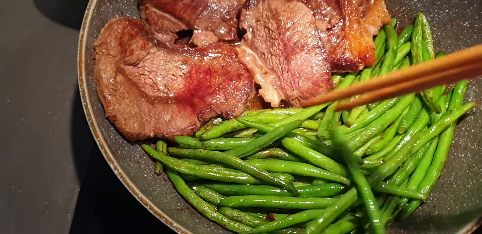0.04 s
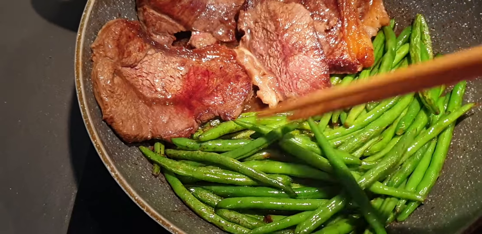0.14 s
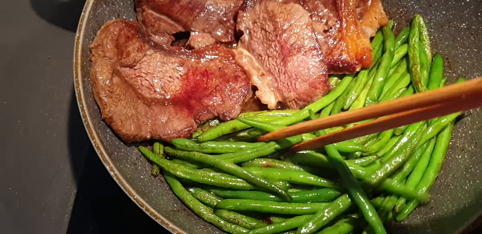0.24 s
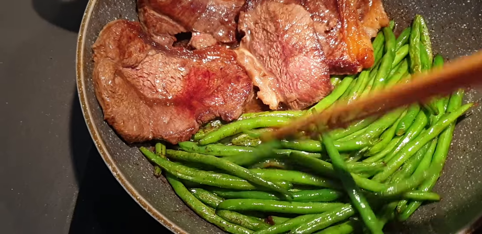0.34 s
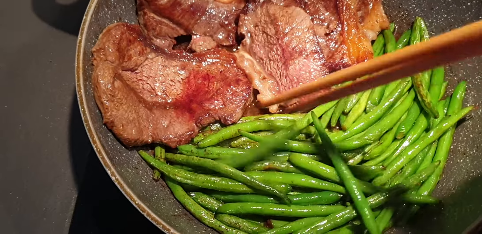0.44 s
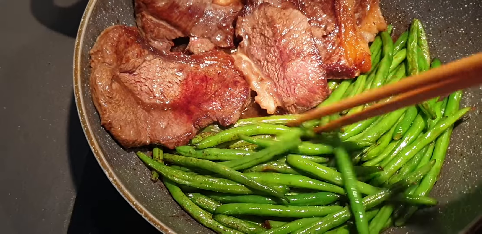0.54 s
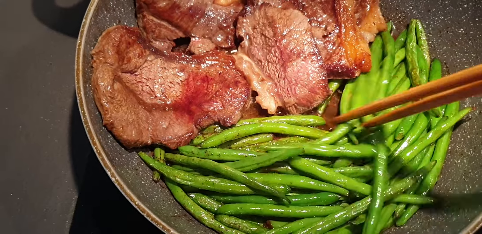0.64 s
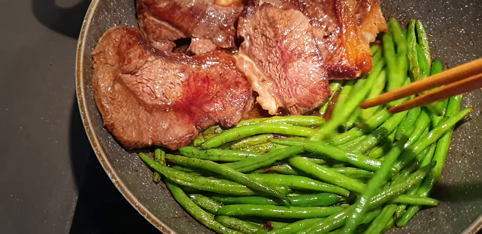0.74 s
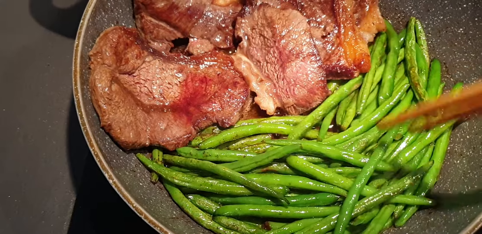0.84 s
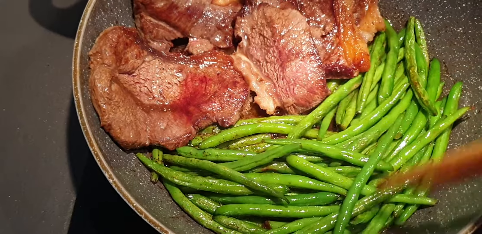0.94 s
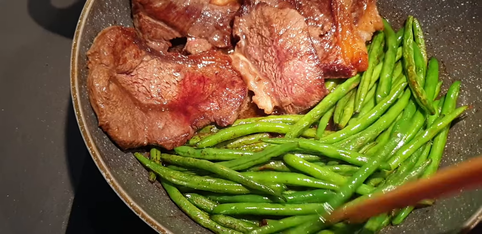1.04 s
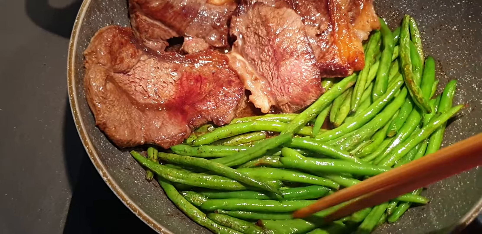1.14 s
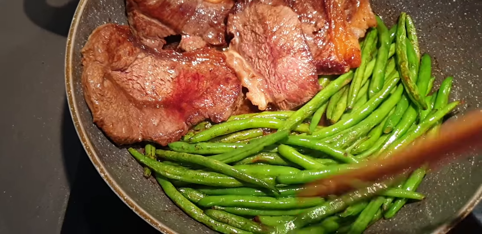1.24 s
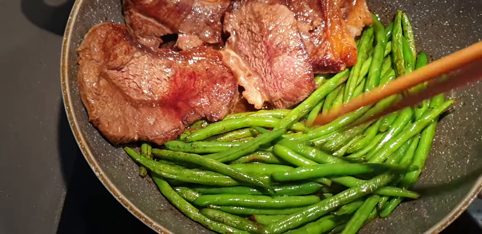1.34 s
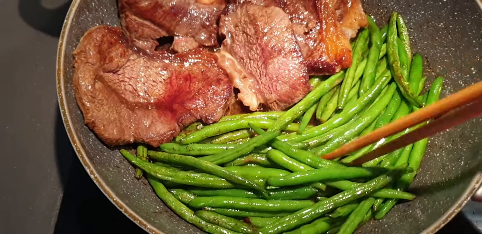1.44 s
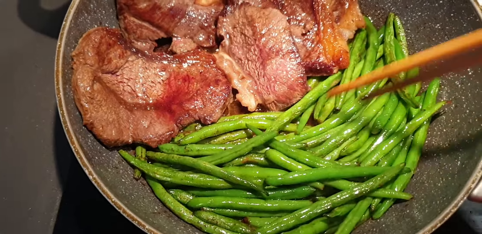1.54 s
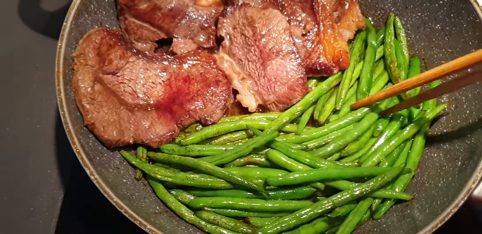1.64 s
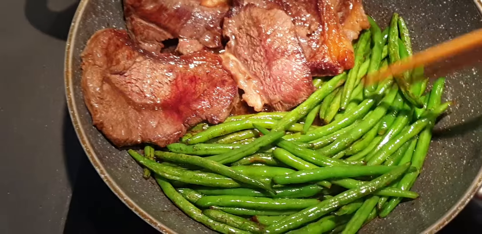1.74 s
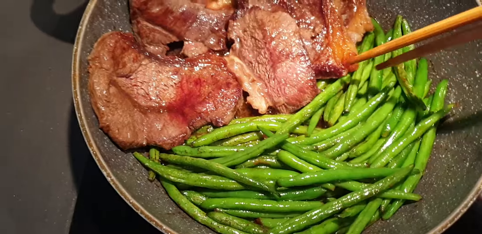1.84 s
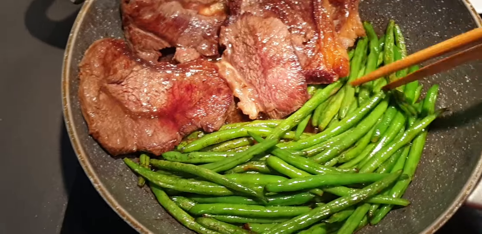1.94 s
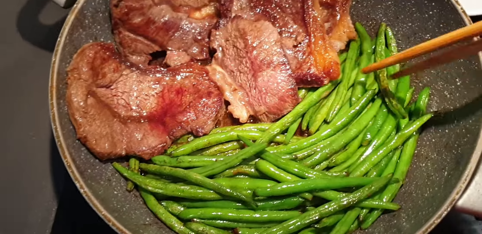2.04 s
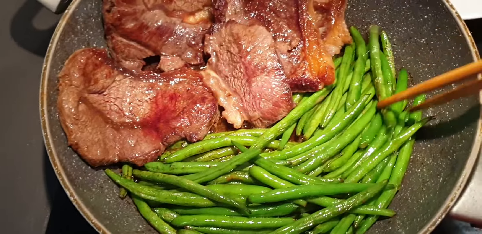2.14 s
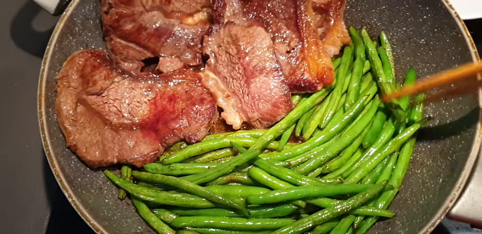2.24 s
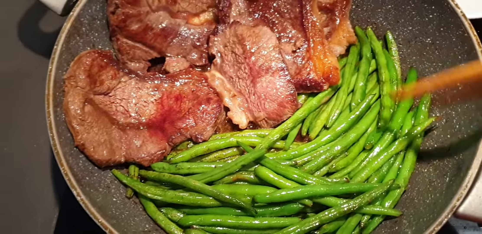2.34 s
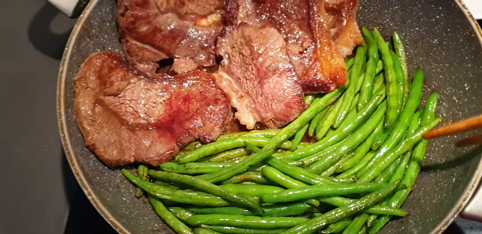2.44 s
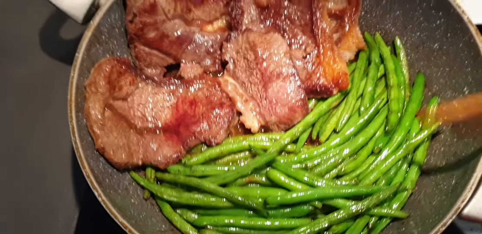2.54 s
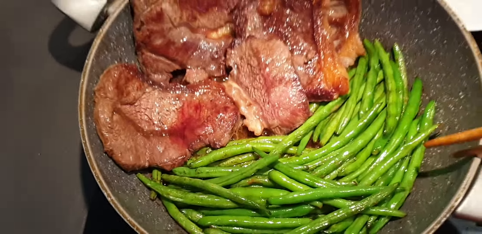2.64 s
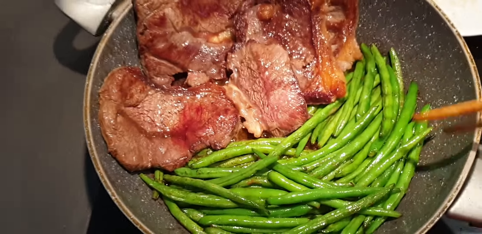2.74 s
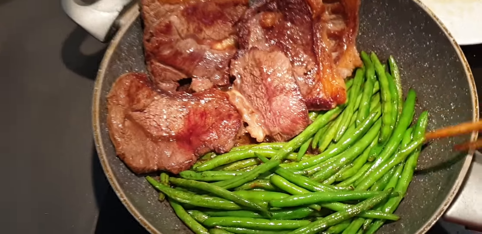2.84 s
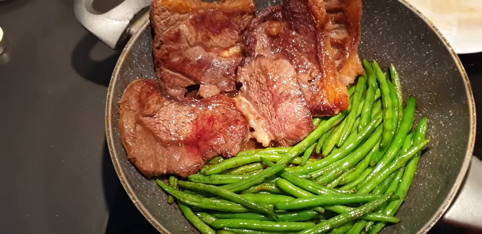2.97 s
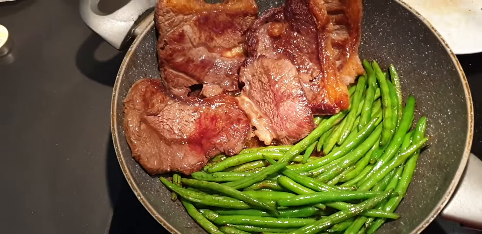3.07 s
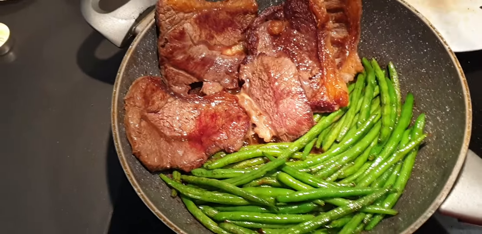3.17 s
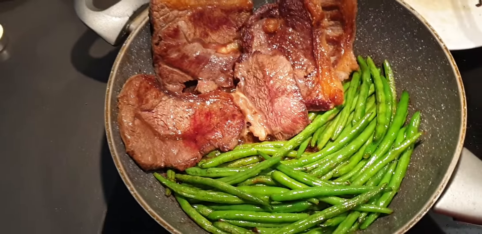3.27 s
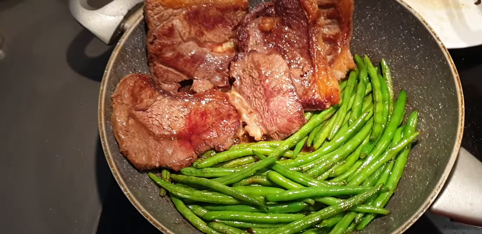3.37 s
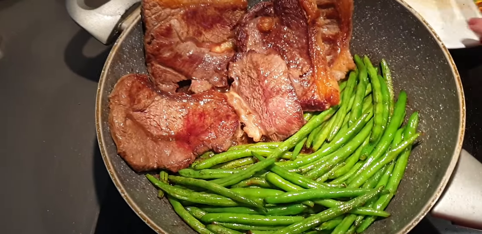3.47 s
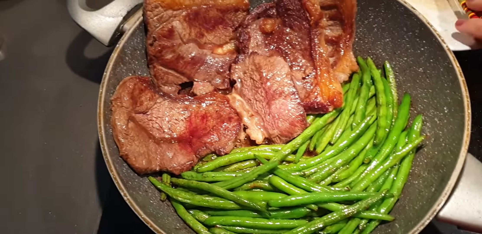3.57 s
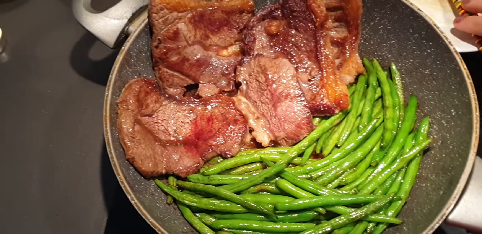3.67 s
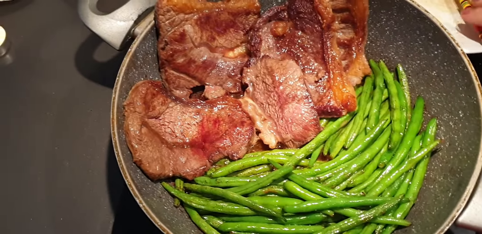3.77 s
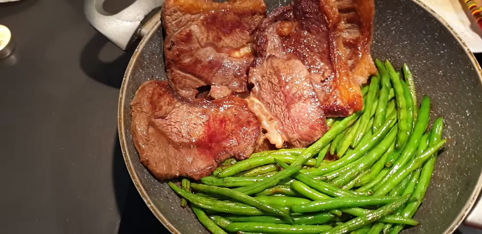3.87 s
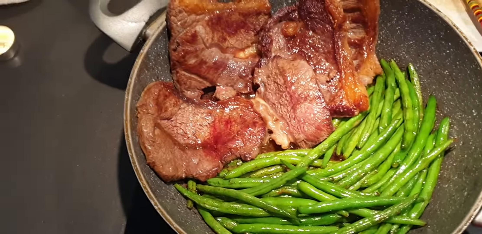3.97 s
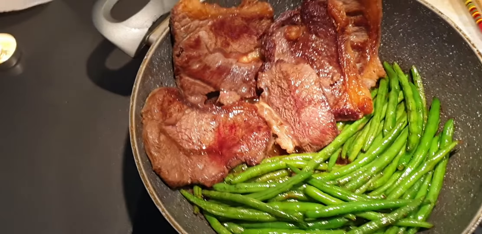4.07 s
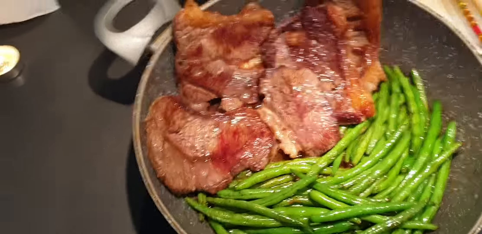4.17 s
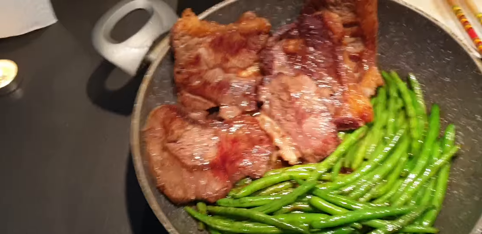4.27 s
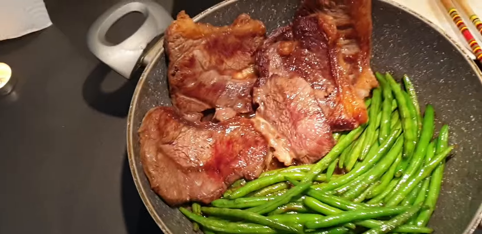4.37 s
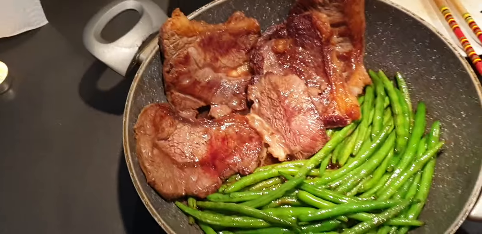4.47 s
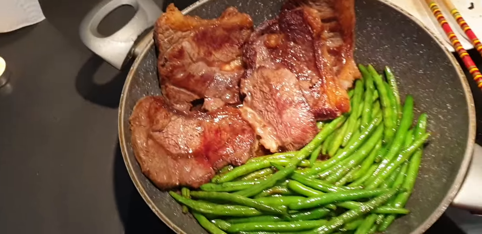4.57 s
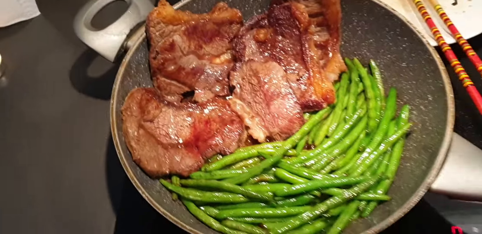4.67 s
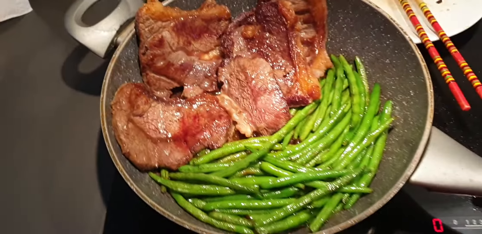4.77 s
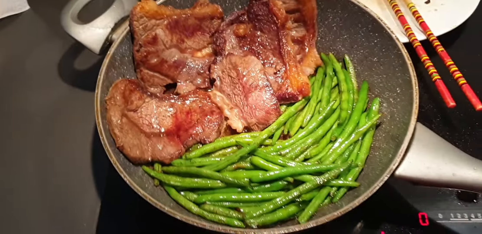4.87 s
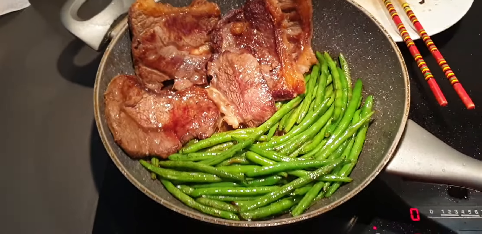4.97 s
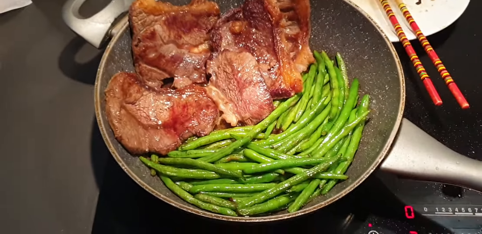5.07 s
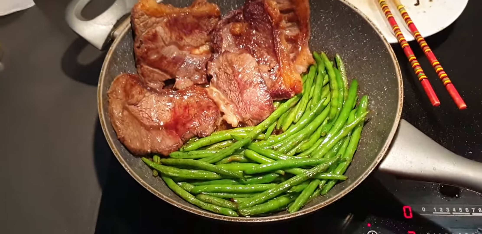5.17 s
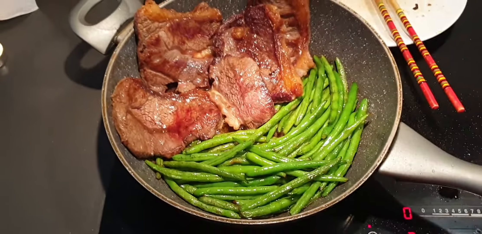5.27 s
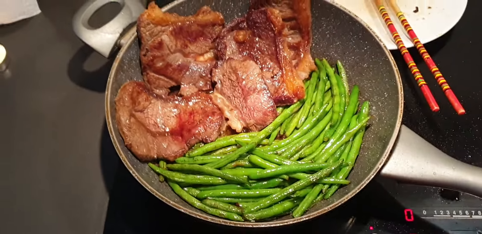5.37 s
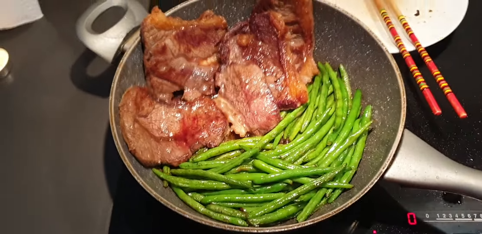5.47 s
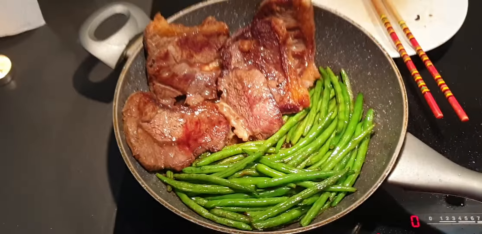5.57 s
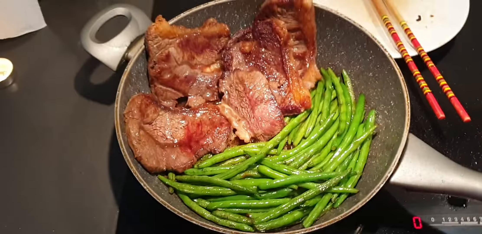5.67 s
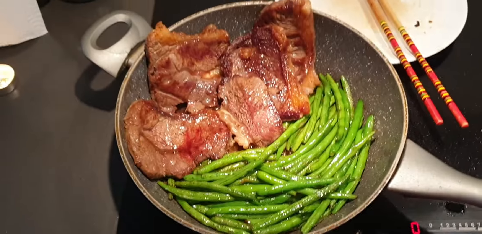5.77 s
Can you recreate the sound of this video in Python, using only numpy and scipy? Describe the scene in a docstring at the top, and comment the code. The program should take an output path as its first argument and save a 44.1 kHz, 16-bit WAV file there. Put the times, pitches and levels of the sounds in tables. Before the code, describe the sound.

Close stereo pickup in a small, hard kitchen, weighted left: faint frying hiss with fat ticks and airy steam puffs above a steady low rumble and fan tone. After a dull thump, three short dry wooden raps hit the pan edge. Shortly after, chopsticks clatter on a ceramic plate with a thud beneath, by far the loudest event. The fan then slows, thin squeaks chirp, and fabric rustles softly near the end.

```python
"""Quiet frying with wooden chopsticks

Steak and beans fry in a pan: the sizzle is filtered grainy noise, fading as the pan dries. The hob's
rumble and fan are filtered noise plus a blade tone, weaker as the fan slows. Chopsticks rap the rim three
times and drop rattling on a plate, with thumps below: each contact rings damped modes and cracks. Fat spits,
stirring ticks, steam puffs and a late cloth rustle are noise bursts; steam squeaks glide. Two ports hear it."""
import sys
import numpy as np
from scipy import signal
from scipy.fft import rfft, irfft, next_fast_len
from scipy.io import wavfile
from scipy.ndimage import uniform_filter1d

SR = 44100
rng = np.random.default_rng(int(sys.argv[2]) if len(sys.argv) > 2 else 0)


def bounce(signal):
    """Save signal as a 16-bit WAV file at the path given by the first command-line argument."""
    frames = np.transpose(np.atleast_2d(signal))
    limited = np.clip(frames, -1, 1)
    pcm = np.round(limited * 32767).astype(np.int16)
    wavfile.write(sys.argv[1], SR, pcm)


N = 256220
SIDES = np.array([[1], [-1]])  # left, right
HOP = 256  # samples between short-time spectra


def undb(db):
    """Level definition: the amplitude gain of a level in dB."""
    return 10 ** (np.asarray(db) / 20)


def read(table, hz):
    """Logarithmic pitch scale: a (f/Hz, value) table interpolated over log frequency."""
    f, v = np.transpose(table)
    return np.interp(np.log(np.maximum(hz, 1)), np.log(f), v)


def curves(table, t):
    """Linear interpolation: each column of a table whose first column is t/s."""
    times, *columns = np.transpose(table)
    return [np.interp(t, times, column) for column in columns]


def decay(t, t60):
    """Reverberation time: an exponential that falls 60 dB in t60 seconds."""
    return np.exp(-np.log(1000) * t / t60)


def walk(rate, count=1, step=1):
    """Smoothed random modulation: rows of levels held 1 / rate s and slewed twice, one value per step."""
    k, size = max(int(SR / rate / step), 1), N // step + 2
    held = np.repeat(rng.standard_normal((count, size // k + 1)), k, axis=1)
    return uniform_filter1d(uniform_filter1d(held, k), k)[:, :size]


def add(out, s, sound):
    """Superposition: mix a sound in at s seconds."""
    i = int(s * SR)
    out[:, i:i + sound.shape[-1]] += sound[..., :N - i]


# Likeness of the two channels, 0 to 1: f/Hz, likeness
LIKENESS = [(60, 1), (130, 1), (290, 0.68), (640, 0.87), (1410, 0.67), (3100, 0), (6820, 0.22), (15000, 0)]


def alike(hz):
    """Interaural-style coherence: how alike the two ports hear a frequency."""
    return np.clip(read(LIKENESS, hz), 0, 1)


def spread(mid, side, likeness):
    """Mid-side coherence: two independent noises make a stereo pair of the given likeness."""
    return mid * np.sqrt(1 + likeness) + SIDES * side * np.sqrt(1 - likeness)


def noise(t, hz, width_hz, top_hz=20000):
    """Band-limited noise: stereo, of rms 1, as alike left and right as at the band's centre."""
    edges = [max(hz - width_hz / 2, hz / 5), min(hz + width_hz / 2, top_hz)]
    band = signal.butter(2, edges, "band", fs=SR, output="sos")
    mid, side = signal.sosfilt(band, rng.standard_normal((2, len(t))))
    return spread(mid, side, alike(hz)) / mid.std() / np.sqrt(2)


def bed(colour, swell_db, flicker_db, rate, grain=1, tilt_db=0):
    """Spectral shaping: noise set to rms 1, then third-octave bands swell together and flicker alone."""
    size = next_fast_len(N)
    hz = np.arange(size // 2 + 1) * SR / size
    mid, side = rfft(rng.standard_normal((2, N)) * grain, size)
    pair = irfft(spread(mid, side, alike(hz)) * undb(read(colour, hz)), size)[:, :N]
    f, _, cells = signal.stft(pair / pair.std(), SR, nperseg=2 * HOP)
    # each frequency takes its flicker from the two nearest band positions
    band = 3 * np.log2(np.maximum(f, 86) / 86)
    low = band.astype(int)
    flicker = walk(rate, count=26, step=HOP)
    db = flicker_db * (flicker[low] + (band - low)[:, None] * (flicker[low + 1] - flicker[low]))
    db = db + swell_db * walk(rate / 4, step=HOP)
    treble_octaves = np.log2(np.maximum(f, 6000) / 6000)[:, None]
    db = db[:, :cells.shape[-1] - 1] + tilt_db * treble_octaves
    gain = undb(np.pad(db, ((0, 0), (0, 1)), "edge"))
    return signal.istft(cells * gain, SR, nperseg=2 * HOP)[1][:, :N]


# Decay time of the room: f/Hz, t60/s
ROOM_DECAY = [(200, 0.94), (1000, 0.52), (4000, 0.49), (12000, 0.28)]


def kitchen(dry, level_db=-10.5):
    """Diffuse reverberation: a small hard room's dense noise tail, shorter in the treble."""
    f, t, cells = signal.stft(rng.standard_normal((2, SR // 2)), SR, nperseg=128)
    tail = signal.istft(cells * decay(t, read(ROOM_DECAY, f)[:, None]), SR, nperseg=128)[1]
    # silent for 4 ms, then rising over 11 ms
    tail = tail * np.clip((np.arange(tail.shape[1]) / SR - .004) / 0.011, 0, 1)
    tail = tail / np.sqrt((tail ** 2).sum(1).mean())
    return undb(level_db) * signal.oaconvolve(dry, tail, axes=1)[:, :N]


# Relative spectrum of the rumble: f/Hz, level/dB per Hz
RUMBLE_COLOUR = [(15, -48), (25, -19), (54, 2), (68, 2.5), (87, -11), (103, -2), (119, 2), (146, -8),
                 (195, -12.5), (258, -17), (345, -13), (385, -21), (450, -20), (580, -51), (990, -120)]
# Course of the hob's noise as its fan slows: t/s, fan level/dB, rumble level/dB
HOB_LEVELS = [(0, -63, -55.5), (2.5, -63, -56.5), (3.9, -64.5, -58), (4.55, -67, -60), (4.9, -71, -63),
              (5.4, -69.5, -63), (5.65, -69, -59.5)]


def hob_rumble(t):
    """Low-frequency broadband noise: the rumble follows the hob's level curve."""
    _, rumble_db = curves(HOB_LEVELS, t)
    return undb(rumble_db) * bed(RUMBLE_COLOUR, 1.0, 1.4, 4)


# Relative spectrum of the fan's noise: f/Hz, level/dB per Hz
FAN_COLOUR = [(290, -38.5), (500, -7.5), (591, -16), (756, -8.5), (836, -13), (909, -3.5), (988, -10),
              (1060, -4), (1210, -1.5), (1310, -2.5), (1900, -10), (2470, -39), (4180, -120)]
BLADE_HZ, BLADE_DB = 1245, -7.5  # mean pitch; initial mean level against the fan noise
BLADE_FADE_START_S, BLADE_FADE_DB_S = 4.3, 10


def hob_fan(t):
    """Blade-passing tone in flow noise: the wavering tone sinks into the noise as the fan slows."""
    fan_db, _ = curves(HOB_LEVELS, t)
    fade_db = BLADE_FADE_DB_S * np.maximum(t - BLADE_FADE_START_S, 0)
    blade_db = BLADE_DB - fade_db + 5.5 * walk(10)[0, :N]
    blade_hz = BLADE_HZ * (1 + 0.0012 * walk(7.4)[0, :N])
    blade = undb(blade_db) * np.sin(2 * np.pi * np.cumsum(blade_hz) / SR)
    return undb(fan_db) * (bed(FAN_COLOUR, 0.9, 0.94, 8) + blade)


# Steam squeaks: start t/s, length t/s, first f/Hz, middle f/Hz, last f/Hz, level/dB,
# octave level/dB against the fundamental
STEAM_SQUEAKS = [(1.267, 0.024, 5600, 5200, 4830, -64, -20), (1.365, .075, 2500, 3100, 2630, -65, -15),
                 (1.992, 0.048, 3200, 3410, 3150, -64, -4), (3.09, 0.044, 3300, 3170, 2900, -69, -16),
                 (3.232, 0.055, 5350, 5180, 5400, -60.5, -20), (4.753, 0.027, 3600, 3520, 3500, -64.5, -4),
                 (4.845, 0.021, 3950, 3800, 3550, -68.5, -2), (4.955, 0.095, 3200, 3420, 3200, -65, 2),
                 (5.09, .06, 3600, 3480, 3090, -66, 2), (5.385, .03, 3850, 3500, 3200, -67, -10),
                 (5.748, 0.026, 3800, 3600, 3380, -69.5, 1)]


def squeaks(waver=0.028, flutter_db=4.5):
    """Whistle in a gap: forced steam sounds a gliding harmonic tone; pitch and level tremble."""
    out, tremble, flutter = np.zeros((2, N)), walk(200)[0], walk(110)[0]
    for s, length, first_hz, middle_hz, last_hz, db, octave_db in STEAM_SQUEAKS:
        u = np.linspace(0, 1, int(length * SR))
        i = int(s * SR) + np.arange(len(u))
        # a parabola through the three pitches
        arc = np.polyval(np.polyfit([0, .5, 1], [first_hz, middle_hz, last_hz], 2), u)
        phase = 2 * np.pi * np.cumsum(arc * (1 + waver * tremble[i])) / SR + 0.38 * SIDES
        overtones = np.sin(2 * phase) + 0.4 * np.sin(3 * phase)
        tone = np.sin(phase) + undb(octave_db) * overtones
        add(out, s, tone * np.sin(np.pi * u) ** .4 * undb(db + flutter_db * flutter[i]))
    return out


# Steam puffs, and from 5.25 s the soft broad swishes of a cloth rustle (the last three rows):
# middle t/s, length at half amplitude t/s, centre f/Hz, bandwidth f/Hz, level/dB at the middle
PUFFS_AND_RUSTLE = [(0.094, 0.053, 9500, 2500, -62), (0.309, 0.053, 8800, 2000, -60.5),
                    (.37, .06, 12500, 4050, -65), (.54, 0.047, 8050, 2000, -62),
                    (0.602, 0.055, 13400, 3000, -64), (0.696, 0.023, 11200, 1970, -57),
                    (1.16, .08, 12900, 4500, -63), (1.47, 0.085, 12100, 5000, -68),
                    (2.274, 0.045, 12500, 3000, -65), (3.26, 0.08, 4900, 1500, -65.5),
                    (4.625, 0.095, 12000, 6000, -70), (5.287, 0.086, 4000, 7000, -59.5),
                    (5.405, 0.1, 4070, 8000, -59.5), (5.48, 0.051, 2490, 4000, -64)]


def puffs_and_rustle():
    """Enveloped band noise: steam puffs, then cloth swishes, each swell and die away."""
    out = np.zeros((2, N))
    for s, length, hz, width_hz, db in PUFFS_AND_RUSTLE:
        t = np.arange(int(2 * length * SR))
        add(out, max(s - length, 0), undb(db) * noise(t, hz, width_hz) * np.hanning(len(t)))
    return out


# Fat spits, and small low stirring ticks of the chopsticks in the pan (at 0.279 and 0.397 s):
# t/s, level/dB at the start, centre f/Hz
SPITS_AND_STIRRING = [(0.2687, -58, 9290), (.279, -53, 2200), (.397, -53, 1900), (0.522, -55, 8300),
                      (0.694, -53, 10500), (0.886, -54, 6160), (1.6483, -41.5, 13500), (1.649, -54, 3500),
                      (1.83, -54.5, 5800), (2.579, -54.5, 7960), (2.596, -54, 9050), (3.716, -51, 12000),
                      (4.3439, -57, 9640), (4.5929, -52, 11000), (4.646, -53, 3500), (4.648, -44.5, 12900),
                      (4.921, -57.5, 5100)]
CLICK_DECAY_S, CLICK_WIDTH = .003, .85  # time constant; bandwidth as a share of the centre


def spits_and_stirring():
    """Impulsive noise: water drops bursting in the fat and two stirring ticks are decaying band noise."""
    out, t = np.zeros((2, N)), np.arange(SR // 20) / SR
    for s, db, hz in SPITS_AND_STIRRING:
        add(out, s, undb(db) * noise(t, hz, CLICK_WIDTH * hz) * np.exp(-t / CLICK_DECAY_S))
    return out


TICKS_PER_S, TICK_HZ, TICK_DECAY_S = 30, 11500, .0015
TICK_DB, TICK_FADE_DB_S = -62, .7  # mean level at the outset; its fall


def fat_ticks(t):
    """Poisson impulses: the fat ticks faintly at random times, softer as the pan dries."""
    tick_db = TICK_DB + 3 * rng.standard_normal(N) - TICK_FADE_DB_S * t
    starts = (rng.random(N) < TICKS_PER_S / SR) * undb(tick_db)
    envelope = signal.lfilter([1], [1, -np.exp(-1 / (TICK_DECAY_S * SR))], starts)
    return noise(t, TICK_HZ, CLICK_WIDTH * TICK_HZ) * envelope


# Relative spectrum of the sizzle: f/Hz, level/dB per Hz
SIZZLE_COLOUR = [(1180, -31), (2000, -4), (2220, -3.5), (3390, -1), (3660, -2), (4470, -1.5), (7320, -6),
                 (8400, -4.5), (10800, -4.5), (14500, -10.5), (15800, -20)]
# Course of the frying as the pan dries: t/s, level/dB, treble tilt/dB per octave above 6 kHz
FRYING_LEVELS = [(0, -60, 1), (.7, -60, 1.5), (1, -60.5, -2.5), (1.35, -60, -2.5), (1.9, -61, 1),
                 (2.45, -62, .5), (3, -60.5, 0), (3.4, -63, 1), (4.2, -62.5, -.5), (5.2, -62.5, .5),
                 (5.81, -63.5, .5)]


def sizzle(t):
    """Bubble noise: countless tiny bursts, a few larger, with brief showers brightening the treble."""
    sizzle_db, tilt_db = curves(FRYING_LEVELS, t)
    bubbles = undb(2.4 * rng.exponential(size=N))
    showers_db = tilt_db[::HOP] + 2.3 * walk(45, step=HOP)[0, :-1]
    return undb(sizzle_db) * bed(SIZZLE_COLOUR, 1.1, 1.9, 18.11, bubbles, showers_db)


PORT_LAG = 2.2  # radians between the ports for a mode heard wholly unlike


def blows(events, modes, body):
    """Modal excitation: a contact rings the modes near its spectral centre, with a crack and a noise haze."""
    crack_db, crack_s, crack_top_hz, free_db, haze_db, haze_s, pan_db = body
    out, t = np.zeros((2, N)), np.arange(SR // 2) / SR
    hz, db, t60 = np.array(modes).T
    tones = np.exp(np.outer(2j * np.pi * hz - np.log(1000) / t60, t))
    # wood resting on the body damps it fast; only a share rings on freely
    cracking = np.exp(-t / crack_s)
    damping = undb(free_db) + (1 - undb(free_db)) * cracking
    hiss = undb(crack_db) * cracking + undb(haze_db) * decay(t, haze_s)
    # neighbouring modes start in opposite directions; the ports hear high modes from different sides
    order = np.arange(len(hz))
    lag = (-1) ** order * PORT_LAG * (1 - alike(hz))
    start = np.exp(1j * (np.pi * order + SIDES * lag / 2))
    for s, blow_db, centre_hz, octaves, rise in events:
        size = undb(db) * np.exp(-.5 * (np.log2(hz / centre_hz) / octaves) ** 2)
        ring = ((size * start) @ tones).imag * damping
        crack = noise(t, 1.216 * centre_hz, 1.04 * centre_hz * octaves, crack_top_hz) * hiss
        attack = 1 - np.exp(-t / rise)
        add(out, s, (ring + crack) * attack * undb(blow_db + SIDES * pan_db / 2))
    return out


# Thumps: t/s, level/dB, centre of the contact's spectrum f/Hz, spread/octaves, rise constant t/s
COUNTER_THUMPS = [(1.992, -34.5, 58, 0.5, 0.0044), (2.536, -54, 250, 0.77, 0.0033),
                  (2.692, -43.5, 240, 0.88, 0.0029), (2.903, -52, 180, 1.1, 0.0023),
                  (3.592, -46, 172, 0.93, 0.0033), (3.64, -48, 149, 0.73, .006),
                  (3.745, -31, 180, 2.8, 0.0031), (3.774, -29.5, 170, 2.2, 0.0044),
                  (4.69, -45, 330, .45, 0.012)]
# Modes of the counter: f/Hz, relative level/dB, free t60/s
COUNTER_MODES = [(64, -5, 0.27), (133.6, -2, 0.57), (168.4, -3.5, 0.21), (216.7, -6, 0.22), (280, -7, 0.45),
                 (389, -13, 0.12), (456.3, -13, 0.31)]
# Answer of the counter: crack level/dB, crack decay constant t/s, crack top f/Hz, free ring level/dB,
# haze level/dB, haze t60/s, left minus right level/dB
COUNTER_ANSWER = (-6.5, 0.036, 700, -1.5, -30, .3, -2.5)


def counter_thumps():
    """Low modal response: contacts thump the counter."""
    return blows(COUNTER_THUMPS, COUNTER_MODES, COUNTER_ANSWER)


# Chopsticks on the plate: t/s, level/dB, centre of the contact's spectrum f/Hz, spread/octaves,
# rise constant t/s
DROPS = [(3.5917, -48.5, 1500, 1.6, 0.004), (3.625, -50, 910, 0.57, 0.0033),
         (3.7435, -14, 3300, 1.9, 0.0019), (3.7585, -20.5, 2900, 1.82, 0.0017),
         (3.7735, -20.5, 2900, 2.3, 0.0017), (3.799, -34, 5000, 3.1, 0.0017)]
# Modes of the plate: f/Hz, relative level/dB, free t60/s
PLATE_MODES = [(966, 0, 0.33), (1095, -14, 0.27), (1378, -7, 0.22), (1741, -12, 0.47), (1808, -11, 0.2),
               (1941, -1, .12), (2019, -12, 0.23), (2747, -2.5, 0.42), (2800, -15, .25), (3568, 0, 0.3),
               (3638, -4, 0.2), (4151, -23, .12), (4357, 0, 0.18), (4428, -3, 0.45), (4750, -10, .2),
               (5370, 0, 0.14), (7170, -16, .15), (8554, -14, .12), (9950, -8, .06), (10380, -5, .06),
               (11540, -7, .05)]
# Answer of the plate: columns as for the counter
PLATE_ANSWER = (.5, 0.0058, 15000, -15, -30, .35, -2)


def plate_drops():
    """Repeated impact: the dropped chopsticks rattle, each contact ringing the plate's modes."""
    return blows(DROPS, PLATE_MODES, PLATE_ANSWER)


# Chopsticks on the rim: t/s, level/dB, centre of the contact's spectrum f/Hz, spread/octaves,
# rise constant t/s
TAPS = [(2.5345, -40, 2500, 1.3, 0.0018), (2.6905, -26, 6500, 1.59, 0.0013),
        (2.9012, -34, 5070, 1.65, 0.0022)]
# Modes of the pan: f/Hz, relative level/dB, free t60/s
PAN_MODES = [(862, 0, 0.12), (1190, -4, .03), (1455, -2, 0.063), (1960, -4, 0.047), (2480, 5, 0.033),
             (2630, -6.5, 0.037), (3080, -5, 0.035), (3320, 2, 0.021), (3910, 2, 0.027), (4790, -3, 0.037),
             (5350, -2, 0.043), (5860, 3, 0.04), (6160, 2, 0.035), (6630, 6, 0.03), (7480, 0, 0.031),
             (8360, 2, 0.018), (8420, 7, 0.032), (9535, 7, 0.033), (10240, -2, .022), (11900, -4, 0.025)]
# Answer of the pan: columns as for the counter
PAN_ANSWER = (9.4, 0.0047, 10500, -7.5, -16, .5, -3)


def rim_taps():
    """Contact-damped modes: three raps of wood on the pan's rim ring briefly."""
    return blows(TAPS, PAN_MODES, PAN_ANSWER)


def scene():
    """Superposition of sources: hob and sizzle under blows, bursts and squeaks, some with the room's tail."""
    t = np.arange(N) / SR
    background = hob_rumble(t) + hob_fan(t) + sizzle(t)
    near = rim_taps() + plate_drops() + spits_and_stirring() + puffs_and_rustle() + fat_ticks(t)
    return background + near + kitchen(near) + squeaks() + counter_thumps()


# Balance of the ports: f/Hz, left minus right level/dB
PORT_BALANCE = [(60, 7), (110, 6), (200, 5.0), (380, 6), (700, 15.5), (1290, 8.5), (2380, 12), (4400, 9),
                (8120, 4), (15000, 4.5)]
BOTTOM_HZ, TOP_HZ = 40.4, 15850


def record(dry):
    """Directional band-limiting: the left port faces the pan more openly; deep bass and top are cut."""
    size = next_fast_len(N + SR // 10)
    hz = np.arange(size // 2 + 1) * SR / size
    bass_cut = hz ** 2 / np.hypot(hz ** 2, BOTTOM_HZ ** 2)
    ports = undb(SIDES * read(PORT_BALANCE, hz) / 2) * bass_cut
    heard = irfft(rfft(dry, size) * ports, size)[:, :N]
    top_cut = signal.ellip(10, .2, 55, TOP_HZ, fs=SR, output="sos")
    return signal.sosfilt(top_cut, heard)


dry = scene()
out = record(dry)
bounce(out)
```